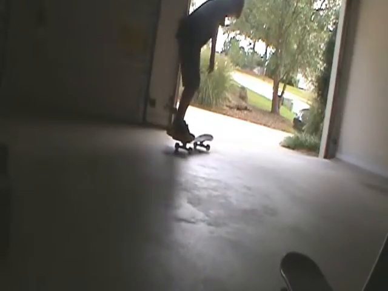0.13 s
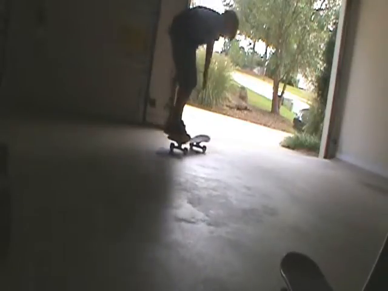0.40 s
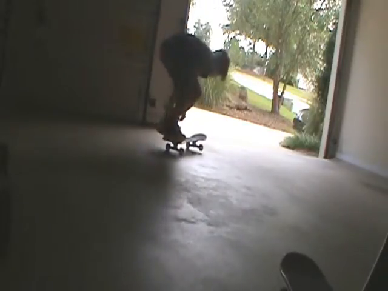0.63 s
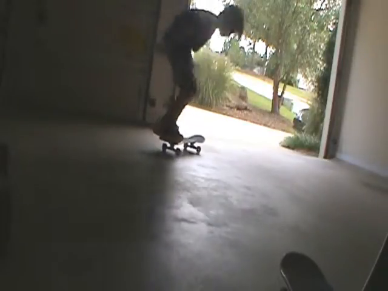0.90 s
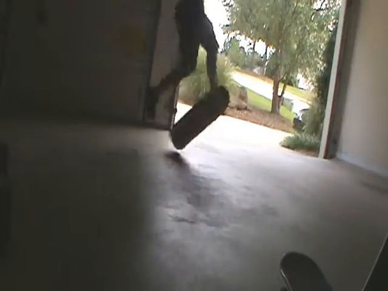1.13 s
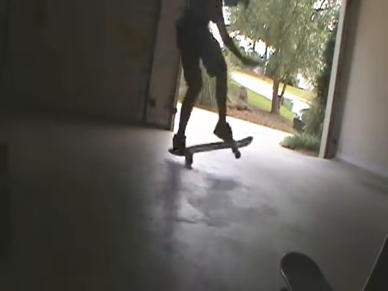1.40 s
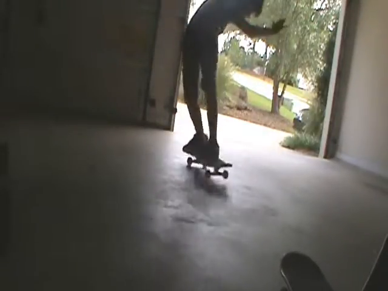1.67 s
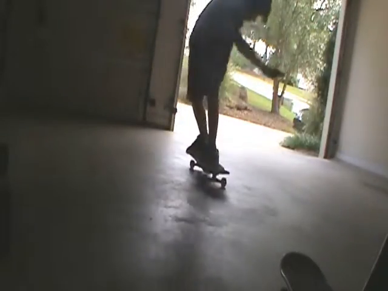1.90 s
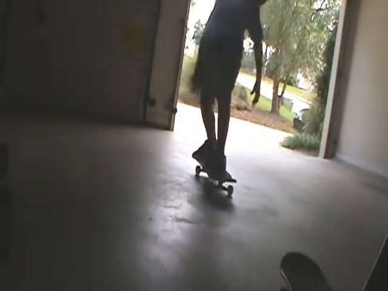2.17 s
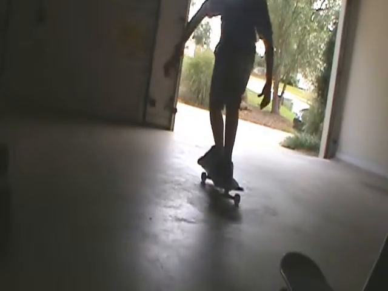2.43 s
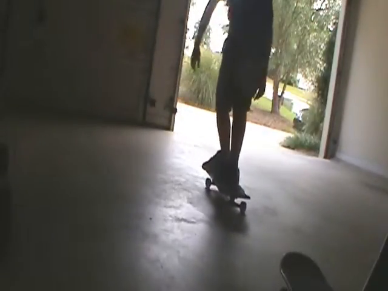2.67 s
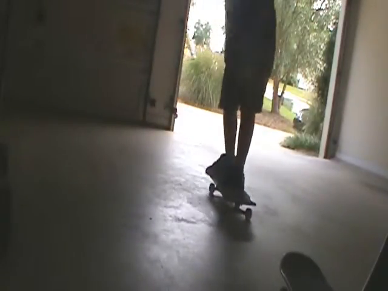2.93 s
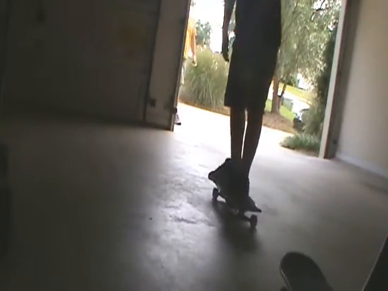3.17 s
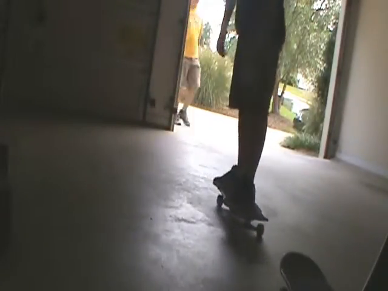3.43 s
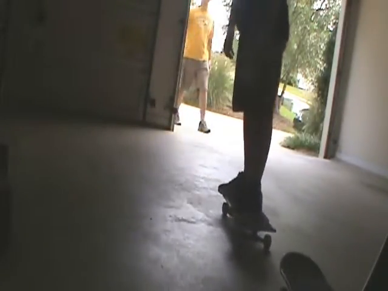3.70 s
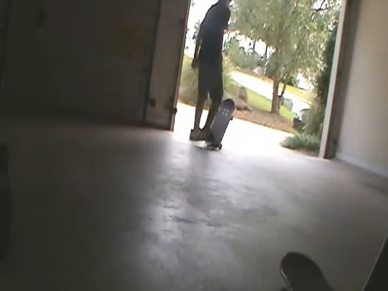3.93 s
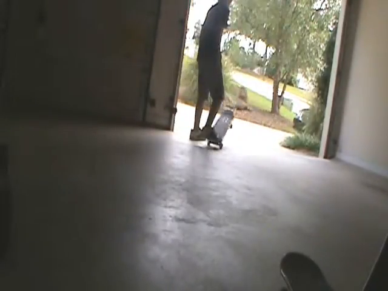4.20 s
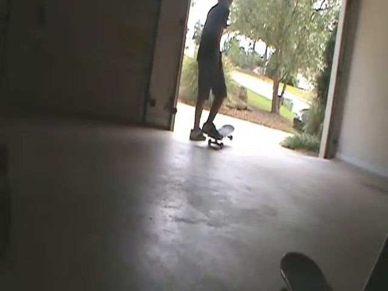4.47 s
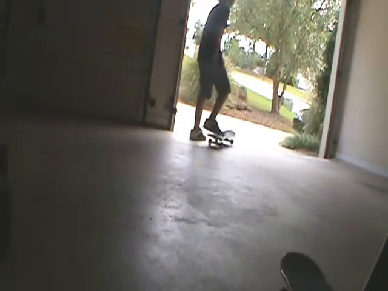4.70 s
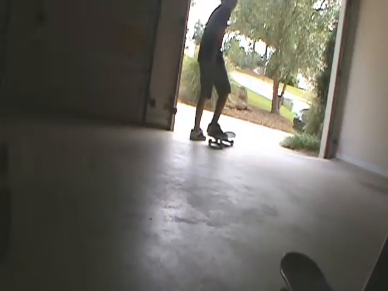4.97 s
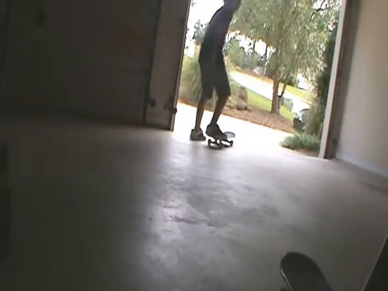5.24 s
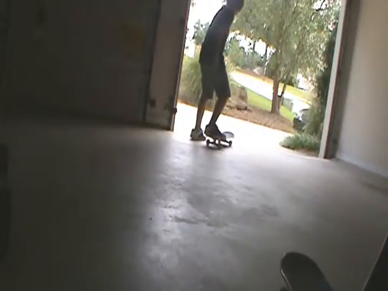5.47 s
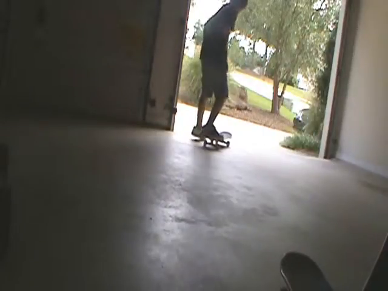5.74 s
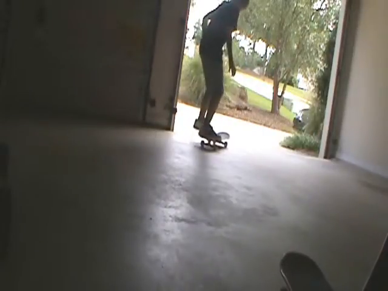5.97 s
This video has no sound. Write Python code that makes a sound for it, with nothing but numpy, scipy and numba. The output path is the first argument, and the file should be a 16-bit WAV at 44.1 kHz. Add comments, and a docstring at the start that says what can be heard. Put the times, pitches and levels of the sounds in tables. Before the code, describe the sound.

In a bare, echoing garage, shoes scuff grip, a skateboard pops and slams onto concrete, then slowed, octave-lower board knocks and a heavy slap follow.

```python
"""A bare concrete garage with a skateboard: shoes scuff the grip, the tail pops, the deck is caught and slaps down.
Blows are noise bursts ringing deck modes and a decaying echo; wheels and soles are shaped noise that swells.
After a cut the board drops and is stamped flat at half speed: an octave lower, the echo twice as long.
A compressor flattens the loud blows and their echo until they sink below its threshold."""
import sys
import numpy as np
from scipy import signal
from scipy.fft import rfft, irfft, next_fast_len
from scipy.io import wavfile
from scipy.ndimage import uniform_filter1d, minimum_filter1d
from numba import njit

SR = 44100
rng = np.random.default_rng(int(sys.argv[2]) if len(sys.argv) > 2 else 0)


def wav_record(signal):
    """Record a signal, one row per channel, as 16-bit PCM in the file named by sys.argv[1]."""
    frames = np.transpose(np.atleast_2d(signal))
    bounded = np.clip(frames, -1, 1)
    # unit amplitude maps onto the largest positive 16-bit level
    quanta = np.round(bounded * 32767).astype(np.int16)
    wavfile.write(sys.argv[1], SR, quanta)


def gain_from_db(level_db):
    """Convert decibel levels to linear amplitude factors (20 dB per decade)."""
    decades = np.asarray(level_db, float) / 20
    return 10 ** decades


N = 269522
CUT_S, SLOW = 3.93, 0.5  # the slowed part starts here, at this speed

# Stereo width of rolling and air at full speed. Each row: frequency in Hz, side minus mid in dB.
WIDE_QUIET = [(60, -40), (110, -31), (280, -30), (650, -6), (1500, -8.5), (2600, -16), (2800, -60),
              (7500, -60), (9500, -15), (12000, -14)]
# Stereo width of everything at half speed. Each row: frequency in Hz, side minus mid in dB.
WIDE_SLOW = [(60, -13), (180, -9), (280, -5), (420, -6.5), (650, -8.5), (1250, -10), (1400, -49),
             (3500, -54), (4400, -16), (6500, -7), (9000, -17), (12000, -12), (15000, -15)]


def board(speed):
    """Superposition: the blows of the full-speed or of the slowed part add, echoes overlapping."""
    # Blows on deck and floor. Each row: start in seconds, knock level in dB, weight (thud over knock) in dB,
    # hardness (clack over knock) in dB, loudest ring in Hz as heard.
    blows = [(0.67, -33, 11, -11, 352), (1.334, -18.5, .5, -3.5, 740), (1.341, -11.5, -.6, 3, 736),
             (1.496, -5.5, -3, 8.5, 3650), (1.795, -12, 10, 3, 446), (1.802, 6, 1.5, -5, 450),
             (2.115, -4, -4.5, 0.2, 560), (3.936, -11, -3.5, 0, 618), (4.185, -18, 0, 2, 776),
             (4.539, -22, 1.5, 1.5, 545), (4.573, -23, -2.5, -4, 630), (4.616, -26, -4, -3, 700),
             (5.357, -36, 13, -12, 150), (5.366, -28, 14, -12, 200), (5.374, 1.5, -1, -2, 320)]
    out = np.zeros((2, N + 5 * SR))
    for start_s, *how in blows:
        if (start_s > CUT_S) == (speed == SLOW):
            sound, lead = blow(*how, speed)
            first = int(start_s * SR) - lead
            out[:, first:first + sound.shape[1]] += sound
    return out[:, :N]


def blow(knock_db, weight_db, hard_db, ring_hz, speed):
    """Impact excitation: a crunch of contact and a short rattle of the trucks ring deck modes, then the garage."""
    # Where thud, knock, body and clack sit at full speed. Each entry: frequency in Hz.
    colour_hz = [280, 650, 1400, 5000]
    # Modes of the deck at full speed. Each row: centre in Hz, width in Hz, peak in dB.
    deck_modes = [(252, 53, 6.5), (343, 29, 6.5), (502, 46, 3.5), (695, 19, 4), (1404, 55, 4),
                  (2300, 190, 2.5)]
    # Plain spectrum of a blow at full speed. Each row: frequency in Hz, density in dB per Hz.
    spectrum_full = [(24, -62), (40, -35), (166, -20.5), (303, -9), (708, -4.5), (1080, -5.5), (1390, -1),
                     (1880, -5.5), (3780, -17.5), (4180, -17.5), (6390, -21.5), (11900, -33.5),
                     (15700, -37)]
    # Plain spectrum of a blow at half speed. Each row: frequency in Hz, density in dB per Hz.
    spectrum_slow = [(24, -59), (40, -19.5), (140, -9.5), (193, -5.5), (242, -5.5), (303, -5), (343, -5),
                     (389, -4.5), (708, -1), (1200, -7.5), (1390, -11), (3020, -17.5), (6070, -29.5),
                     (6880, -32), (15700, -36)]
    # Stereo width of blows at full speed. Each row: frequency in Hz, side minus mid in dB.
    wide_full = [(60, -18), (110, -10), (420, -9), (650, -2.5), (1000, -8), (1500, -7.4), (2600, -15.5),
                 (2800, -48), (7500, -40), (9000, -19), (12000, -3), (15000, -13)]
    contact_s, rattle_s, rattle_db = 0.00097, 0.013, -16.5  # at full speed and zero hardness
    lead, onset = 1024, 128  # samples kept ahead of the blow, samples of fade-in

    echo = garage(speed)
    n = next_fast_len(echo.shape[1] + 8192)
    t = np.arange(4096) * speed / SR
    # a duller blow is a softer, longer contact
    soft = t / (contact_s * gain_from_db(-0.89 * hard_db))
    contact = soft * np.exp(1 - soft)
    rattle = gain_from_db(rattle_db) * np.exp(-t / rattle_s) * (1 - np.exp(-soft))
    crunch = rfft(rng.standard_normal(len(t)) * (contact + rattle), n)
    # flatten the broad spectrum, so that only the gains below set the colour
    crunch = crunch / np.sqrt(uniform_filter1d(abs(crunch) ** 2, n // 400))

    hz = np.fft.rfftfreq(n, 1 / SR)
    body = gain_from_db(read(spectrum_full if speed == 1 else spectrum_slow, hz))
    for mode in deck_modes:
        body = body * resonance(hz / speed, *mode)
    body = body / np.sqrt(np.mean(abs(body) ** 2))
    body_db = -2.6 + 0.4 * hard_db  # the body follows part of the hardness
    colour_db = weight_db, 0, body_db, hard_db
    own = gain_from_db(knock_db + read(list(zip(colour_hz, colour_db)), hz / speed))
    own = own * resonance(hz, ring_hz, 0.065 * ring_hz, 6.04)

    sound = irfft(rfft(echo, n) * crunch * own * body, n)
    fade_in = np.clip((np.arange(n) - lead) / onset + 1, 0, 1)
    mid, side = np.roll(sound, lead, axis=1) * fade_in
    return left_right(mid, side, wide_full if speed == 1 else WIDE_SLOW), lead


def resonance(hz, centre_hz, width, peak_db):
    """Damped mode: a Lorentzian response added on top of the plain sound."""
    return 1 + (gain_from_db(peak_db) - 1) / (1 + 2j * (hz - centre_hz) / width)


def garage(speed):
    """Reverberation: direct sound, lumpy early echoes, then a dense tail with its own decay at each pitch."""
    # Reverberation at full speed. Each row: frequency in Hz, time to fall by 60 dB in seconds.
    decay = [(60, 0.49), (250, 0.83), (600, 0.96), (1400, 1), (2500, 0.88), (4000, 0.72), (8000, 0.78),
             (20000, 0.91)]
    build_s, mixing_s = 0.0017, 0.064  # echo build-up, fading of the lumps; both at full speed
    lumpy_db, lumps_hz = 6.0, 251.0  # scale and rate of the lumps at full speed
    hz, hop = np.fft.rfftfreq(512, 1 / SR), 128
    t = np.arange(int(1.4 / speed * SR / hop)) * hop / SR
    fade = gain_from_db(-60 * speed * t / read(decay, hz / speed)[:, None])
    chance = rng.standard_normal((2, 2, len(hz), len(t)))
    echo = signal.istft(fade * (chance[0] + 1j * chance[1]), nperseg=512, noverlap=384)[1]
    echo = echo / echo[:, :4096].std()
    age = np.arange(echo.shape[1]) * speed / SR
    lumps = gain_from_db(lumpy_db * walk(lumps_hz * speed, size=len(age)) * np.exp(-age / mixing_s))
    echo = echo * lumps * (1 - np.exp(-age / build_s))
    echo[0, 0] = gain_from_db(22.5)  # direct sound, in the mid only
    return echo


def rolling():
    """Friction noise: wheels rumble on concrete and soles rasp on the grip, each with its own spectrum."""
    # The rider shifts weight, soles rasp and wheels load up. Each row: start of full effort in seconds,
    # hold in seconds, grip scuff level in dB, wheel rumble level in dB.
    shifts = [(0.0, .02, -46, -37), (0.11, .06, -35.5, -38), (0.185, .015, -35, -31.5),
              (0.31, .06, -46, -37), (0.525, .02, -40, -37), (0.67, .36, -39, -41), (1.34, .05, -29, -27),
              (2.8, .3, -51, -47), (3.59, .05, -49, -46), (3.67, .09, -46, -41.5), (3.91, .03, -49, -41)]
    # Levels between shifts, one row before and one after the landing. Each row: grip scuff in dB, wheel rumble in dB.
    coast = [(-48, -42), (-54.5, -52)]
    # Wheel rumble spectrum. Each row: frequency in Hz, density in dB per Hz.
    rumble_spectrum = [(15, -46), (25, -22), (118, -10.5), (188, -21.5), (232, 1), (258, -20.5), (294, -6),
                       (326, -12.5), (363, -5), (4000, -23.5), (5200, -60), (8800, -120)]
    # Grip scuff spectrum. Each row: frequency in Hz, density in dB per Hz.
    scuff_spectrum = [(800, -9), (2000, -5.5), (4000, -8.5), (5800, -4.5), (7500, -11.5), (9000, -18.5),
                      (12000, -22), (15500, -30)]
    start_s, hold_s, scuff_db, rumble_db = np.transpose(shifts)
    coast_scuff_db, coast_rumble_db = np.transpose(coast)
    rumble = effort(start_s, hold_s, rumble_db, coast_rumble_db) * hiss(rumble_spectrum, WIDE_QUIET, 1.7, 65.0)
    scuff = effort(start_s, hold_s, scuff_db, coast_scuff_db) * hiss(scuff_spectrum, WIDE_QUIET, 0.77, 150.)
    return rumble + scuff


def effort(starts_s, holds_s, levels_db, coast_db):
    """Power addition: each shift swells, holds and dies away over the quiet coasting."""
    rise_db_per_s, fall_db_per_s, lands_s = 230, 75, 1.8
    t = np.arange(N) / SR
    power = gain_from_db(np.where(t < lands_s, *coast_db)) ** 2
    for start_s, hold_s, level_db in zip(starts_s, holds_s, levels_db):
        before_db = rise_db_per_s * np.maximum(start_s - t, 0)
        after_db = fall_db_per_s * np.maximum(t - start_s - hold_s, 0)
        power = power + gain_from_db(level_db - before_db - after_db) ** 2
    return np.sqrt(power)


def air(speed):
    """Stationary background noise: filtered noise with a slowly wavering level."""
    # Background at full speed. Each row: frequency in Hz, density in dB per Hz.
    air_full = [(15, -40), (25, -13.5), (189, -12), (228, -6), (254, -14), (291, -1), (324, -12),
                (1590, -16.5), (15700, -48)]
    # Background at half speed. Each row: frequency in Hz, density in dB per Hz.
    air_slow = [(15, -46), (25, -2), (129, -3), (370, -24), (635, -22), (1150, -13), (1390, -18),
                (3030, -18), (5790, -32.5), (15700, -39)]
    if speed == SLOW:
        return gain_from_db(-44.5) * hiss(air_slow, WIDE_SLOW, 0.79, 5.74)
    return gain_from_db(-43.5) * hiss(air_full, WIDE_QUIET, 0.59, 7.17)


def hiss(spectrum, wide, grit_db, grit_rate):
    """Modulated noise: shaped stereo noise, mid of rms 1, whose level jitters grit_rate times a second."""
    grit = gain_from_db(grit_db * walk(grit_rate))
    noise = rng.standard_normal((2, N)) * grit
    mid, side = colour(noise, lambda hz: gain_from_db(read(spectrum, hz)))
    return left_right(mid, side, wide) / mid.std()


def walk(rate, size=N):
    """Low-pass random modulation: levels held for 1 / rate seconds and slewed twice."""
    k = int(SR / rate)
    steps = np.repeat(rng.standard_normal(size // k + 1), k)
    return 0.65 * uniform_filter1d(uniform_filter1d(steps, k), k)[:size]


def left_right(mid, side, wide):
    """Interchannel coherence: mid plus and minus a side that in the bass is mostly the phase-shifted mid."""
    lean, lead = 0.11, -0.7  # in-phase and quarter-turn parts of the shared side
    shared_hz = 600. if wide is WIDE_SLOW else 1200.
    share = lambda hz: 1 / (1 + (hz / shared_hz) ** 2)
    own = lambda hz: np.sqrt(np.clip(1 - (lean ** 2 + lead ** 2) * share(hz) ** 2, 0, 1))
    side = colour(side, lambda hz: gain_from_db(read(wide, hz)) * own(hz))
    side = side + colour(mid, lambda hz: gain_from_db(read(wide, hz)) * share(hz) * (lean + 1j * lead))
    return np.array([mid + side, mid - side])


def read(table, hz):
    """Logarithmic pitch scale: interpolates a (Hz, value) table along log frequency."""
    f, v = np.transpose(table)
    return np.interp(np.log(np.maximum(hz, 1)), np.log(f), v)


def colour(x, gain):
    """Linear filtering: multiplies the spectrum of x by gain(Hz)."""
    n = x.shape[-1]
    return irfft(rfft(x) * gain(np.fft.rfftfreq(n, 1 / SR)), n)


def treble_bands(x, speed):
    """Spectral shaping: narrow treble bumps and dips; in the slowed part the same pattern sits an octave lower,
    joined by further bands."""
    # Treble bumps and dips at full speed. Each row: centre in Hz, width in Hz, gain in dB.
    bands_full = [(4480, 72, -2.5), (9100, 500, -2.5), (10900, 110, 0), (12160, 600, -5.5), (13550, 470, 4.5),
                  (14500, 360, 5.5)]
    # Further treble bands at half speed. Each row: centre in Hz as heard, width in Hz, gain in dB.
    slow_bands = [(7340, 120, -5), (9150, 280, 3.5), (13050, 350, 1), (15000, 250, -3)]
    if speed == SLOW:
        return colour(x, lambda hz: ripples(hz / SLOW, bands_full) * ripples(hz, slow_bands))
    return colour(x, lambda hz: ripples(hz, bands_full))


def ripples(hz, table):
    """Sum of Gaussian bells in dB: a gain with a few bumps and dips."""
    return gain_from_db(sum(db * np.exp(-.5 * ((hz - f) / width) ** 2) for f, width, db in table))


def scene():
    """Time scaling: the full-speed part, then the slowed part, each with its treble bands."""
    full = treble_bands(board(1) + rolling() + air(1), 1)
    slow = treble_bands(board(SLOW) + air(SLOW), SLOW)
    return np.where(np.arange(N) / SR > CUT_S, slow, full)


@njit
def follow(x, rise, fall):
    """Envelope detection: a one-pole smoother that rises fast and falls slowly."""
    y, e = np.empty(len(x)), 1e-9
    for i in range(len(x)):
        e += (x[i] - e) * (rise if x[i] > e else fall)
        y[i] = e
    return y


def compress(x):
    """Dynamic range compression: one gain for both channels, which starts to duck just ahead of a blow."""
    threshold_db, ratio = -11, 4.7
    attack_s, release_s, ahead_s = 0.0019, 0.013, 0.0072
    loud = follow(np.sqrt(np.mean(x ** 2, axis=0)), 1 / (attack_s * SR), 1 / (release_s * SR))
    duck_db = -np.maximum(20 * np.log10(loud) - threshold_db, 0) * (1 - 1 / ratio)
    k = int(ahead_s * SR)
    duck_db = uniform_filter1d(minimum_filter1d(duck_db, k, origin=-(k // 2)), k)
    return x * gain_from_db(duck_db)


def narrow(x):
    """Level-dependent width: the stereo picture closes toward the middle when the sound gets quiet."""
    narrow_db, slope = -33, 1  # mid level where closing starts, dB of side lost per dB below it
    mid, side = (x[0] + x[1]) / 2, (x[0] - x[1]) / 2
    mid_db = 10 * np.log10(np.maximum(uniform_filter1d(mid ** 2, SR // 20), 1e-12))
    side = side * gain_from_db(slope * np.minimum(mid_db - narrow_db, 0))
    return np.array([mid + side, mid - side])


def roll_off(x):
    """The treble ends steeply here."""
    return signal.sosfilt(signal.butter(12, 16860, fs=SR, output="sos"), x)


def record(dry):
    """Nonlinear and band-limited chain: compression, narrowing, soft saturation of peaks, top cut."""
    held = narrow(compress(dry))
    soft = np.tanh(0.96 * held) / 1.098
    mix = colour(soft, lambda hz: hz < 16200)
    return roll_off(mix)


dry = scene()
out = record(dry)
wav_record(out)
```